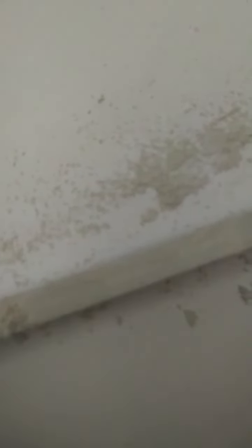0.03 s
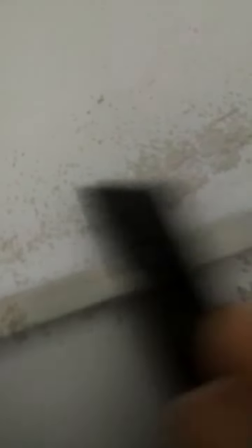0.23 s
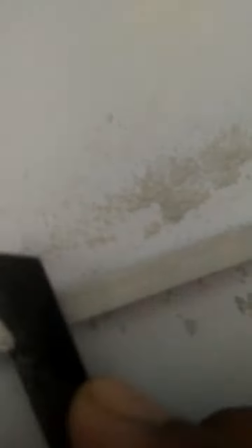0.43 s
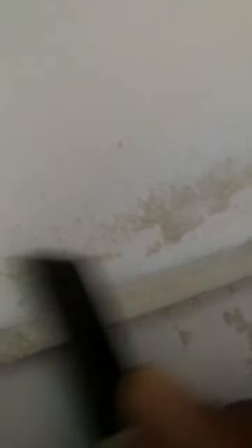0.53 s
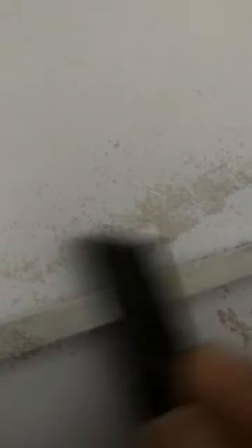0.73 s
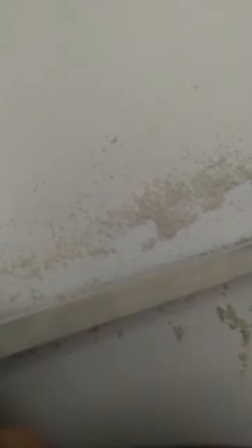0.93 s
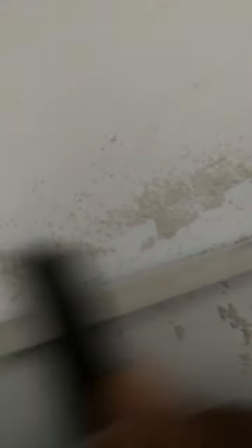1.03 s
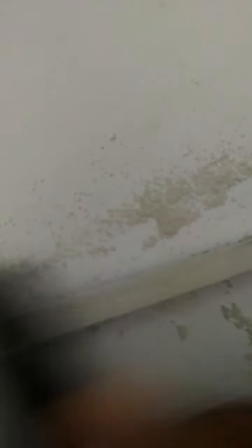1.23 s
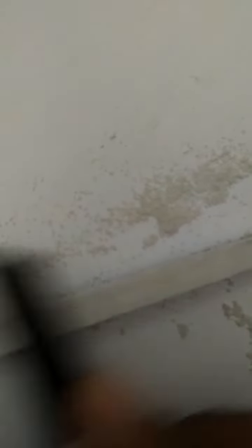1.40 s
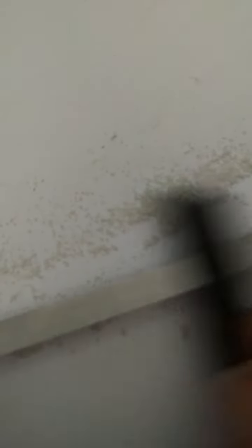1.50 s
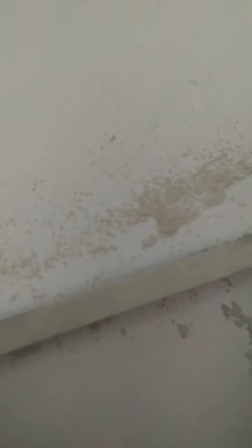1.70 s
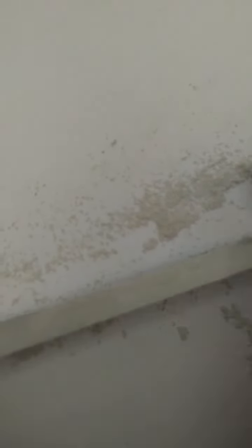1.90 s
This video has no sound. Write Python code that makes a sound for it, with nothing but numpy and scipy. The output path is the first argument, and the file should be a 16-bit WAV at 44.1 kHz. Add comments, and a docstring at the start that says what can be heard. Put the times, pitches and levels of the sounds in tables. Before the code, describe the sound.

Gritty scraping, heard close up in a small quiet room: a flat blade catches on paint chips and rings slightly as it works back and forth three times across a wall, bumping a ledge and finishing with two light taps.

```python
"""A flat hand-held blade scrapes flaking paint off a wall, close to the microphone in a small room.
The edge bites in stick-slip jerks and catches on chips; faint tones rise through the first push.
Three firm pushes go by, each followed by a light drag back: grit under the edge rings the blade, rasps
and hisses while the wall rumbles. From the second drag on, hand and blade bump the ledge.
Last come a couple of taps on the wall as the edge slides off."""
import sys
import numpy as np
from scipy import signal
from scipy.fft import rfft, irfft
from scipy.io import wavfile
from scipy.ndimage import uniform_filter1d

SR = 44100
rng = np.random.default_rng(int(sys.argv[2]) if len(sys.argv) > 2 else 0)


def unload_audio(sound):
    """Save the sound as a 16-bit wav file, at the path given as the first command line argument."""
    columns = np.transpose(np.atleast_2d(sound))
    # keep every value between -1 and 1, then stretch to whole-number steps
    steps = np.round(np.clip(columns, -1, 1) * 32767)
    wavfile.write(sys.argv[1], SR, steps.astype(np.int16))


N = 85995
T = np.arange(N) / SR

# room tone at the microphone: f/Hz, gain/dB
ROOM_TONE_COLOUR = [(25,-2.5),(60,-3.5),(100,5),(190,-8.5),(380,-6.5),(630,-19.5),(1500,-20.5),(2800,-24),(4000,-34.5),(15500,-41)]
# near reflections off wall, ledge and hand: delay/s, gain/dB
REFLECTIONS = [(.0079,-24),(0.0139,-22.5)]
# lightly damped modes of wall and blade: f/Hz, gain/dB
LINGER_MODES = [(90,-10),(512,-5),(625,-1),(1981,-9),(2412,-9.5)]
# gliding tones: t/s, f/Hz, level/dB
THIN_RING_PATH = [(0,2930,-86.5),(.55,2907,-72),(.75,2783,-82),(1.02,2778,-69),(1.23,2830,-79),(1.41,2891,-67),(1.76,2850,-97)]
RISING_TONE_PATH = [(0.124,805,-68),(.17,812,-46),(.225,818,-53),(0.259,835,-76),(0.313,855,-48.5),(0.379,868,-53.5),(0.461,935,-49),(.55,1050,-59),(.605,1170,-77)]
ZING_PATHS = [
    [(.178,5800,-46),(.226,5230,-73),(.3,5800,-58),(.37,5630,-58)],
    [(.85,7000,-66),(.885,7170,-54),(.91,8400,-58.5),(.932,7900,-48),(.98,8360,-61),(.995,8150,-83)],
    [(1.305,6900,-65),(1.335,7460,-57.5),(1.36,8250,-55),(1.39,8000,-57.5),(1.402,8100,-94)],
]  # one table per push
# stick-slip jerks as the first push starts and stops: t/s, level/dB, length/s
JERKS = [(0.113,-57,0.0035),(0.1202,-44.5,0.0031),(0.133,-41.5,0.0028),(0.1374,-40.5,0.0019),(0.144,-51,0.0022),(0.161,-33.5,0.0084),(0.1734,-40,0.0019),(0.511,-55,0.0011)]
# dull bumps on the ledge: t/s, level/dB, f/Hz, t60/s
LEDGE_BUMPS = [(1.096,-30,139,0.074),(1.156,-41,119.5,0.15),(1.433,-29.5,346,0.049),(1.511,-28.5,228,0.034),(1.698,-36.5,297,.04)]
# taps on the wall: t/s, level/dB, tick gain/dB
WALL_TAPS = [(1.6153,-24,-5),(1.689,-20,-15),(1.6923,-30.5,6.5),(1.6946,-25,-13)]
# a tap's knock and its bright tick: f/Hz, gain/dB, t60/s
TAP_KNOCK_MODES = [(268,-19.5,0.042),(474,-12.5,0.022),(1594,-18.5,0.045),(1920,-7,0.0081),(2155,-4.5,0.0087),(3010,-12.5,0.014)]
TAP_TICK_MODES = [(4520,-10.5,0.0039),(5100,-6,0.0017),(7200,-14,0.005),(9100,-11,0.0041),(10900,-19,0.0042)]
# catches on paint chips: t/s, level/dB, blade pitch/Hz
CHIP_CATCHES = [(0.1467,-28.5,2624),(0.1816,-22,2560),(0.2125,-23.5,2550),(0.2154,-20,2550),(0.22,-20,2510),(0.223,-25.5,2540),(.2302,-26.5,2330),(0.2393,-25.5,2450),(0.2457,-23.5,2500),(0.2577,-21.5,2460),(.2618,-26.5,2600),(0.291,-33.5,2620),(0.429,-30,2550),(.882,-26.5,2360),(0.9407,-30.5,2080),(1.6059,-31.5,2440),(1.6106,-28.5,2560),(1.6156,-19.5,2378),(1.6761,-33,2425)]
# the blade as it snaps free: ratio to blade pitch, gain/dB, t60/s
SNAP_MODES = [(.23,-15,0.016),(.93,-5,0.026),(1,7,0.0094),(1.33,-6,0.0022),(2.1,-9,0.0068)]
# colours of the contact, heard close up: f/Hz, gain/dB
BITE_COLOUR = [(100,4),(500,0),(1000,-45.5),(1900,-21),(2300,10),(2750,13.5),(3300,-5),(4000,-10),(4700,-5),(5900,-11.5),(6800,-16.5),(8200,-23),(10000,-29),(15000,-37)]
BLADE_COLOUR = [(500,-60),(1300,-17.5),(1800,1),(2200,-1),(2700,0),(3050,-4.5),(3450,-2),(4000,-11.5),(4500,-5.5),(5200,-10.5),(6000,-6),(6800,-11.5),(9000,-31.5),(15000,-20)]
RASP_COLOUR = [(100,-18),(250,-2.5),(520,3),(750,-1.5),(1100,1.5),(1450,4),(1900,0.5),(2700,-3.5),(3400,-1),(4000,-16),(5300,-23.5),(7000,-26),(10000,-39.5),(15000,-48.5)]
HISS_COLOUR = [(2500,-25.5),(4200,-2.5),(5500,4),(6800,-5.5),(8100,0),(8900,-4.5),(10000,-9.5),(12000,-14),(14000,-46.5),(15500,-15)]
RUMBLE_COLOUR = [(20,-42.5),(40,-32.5),(60,-7),(86,1),(104,-0.5),(140,0.5),(185,-11),(240,-9.5),(330,-9),(540,-13),(720,-27),(1500,-47)]
# one table per stroke, before trims: t/s, blade ring/dB, blade pitch/Hz, rasp/dB, hiss/dB, rumble/dB
PRESS_STROKE = [(.112,-80,2580,-68,-108,-53),(.128,-69.5,2620,-56.5,-102,-50),(.1779,-57,2550,-53.5,-94.5,-63.5)]  # pressing on between the first jerks
PUSH_STROKES = [
    [(.178,-38.5,2630,-46,-56.5,-49.5),(.204,-30,2670,-47.5,-64,-48.5),(.229,-28,2450,-44.5,-48.5,-50.5),(.312,-35,2590,-43,-64.5,-54),(.355,-45.5,2480,-44.5,-59,-53),(.44,-36.5,2660,-46.5,-59,-47),(.503,-42,2404,-47,-72,-47.5),(.516,-53,2380,-51.5,-89,-57),(.529,-59.5,2340,-65,-101,-46.5),(.615,-78,2230,-72,-102,-76)],
    [(.789,-53.5,1990,-55.5,-69,-55.5),(.85,-43.5,2350,-46,-58,-50),(.88,-33.5,2270,-48.5,-55.5,-45),(.93,-37,2060,-46,-53,-48),(.97,-39.5,1883,-47,-86,-46),(.983,-46,2040,-48,-72,-48.5),(.996,-91,2030,-62.5,-90,-51.5),(1.045,-84,2300,-75,-75,-59.5)],
    [(1.237,-95,2090,-74,-99,-74),(1.258,-43.5,2110,-48.5,-61.5,-56),(1.3,-43,2400,-49,-59,-51),(1.322,-35,2500,-44.5,-55,-44.5),(1.355,-33.5,2080,-46.5,-51.5,-45.5),(1.383,-43.5,2080,-44,-61,-48),(1.404,-60,2100,-64,-84,-53),(1.425,-73,2120,-64,-68,-56)],
]
DRAG_STROKES = [
    [(.617,-76,2200,-67,-82,-75),(.626,-67,2310,-63,-80,-50),(.658,-51,2570,-60.5,-67.5,-51),(.694,-62.5,2410,-62,-71.5,-56),(.735,-80.5,2230,-87.5,-102,-69)],
    [(1.05,-74,2210,-68,-82,-51),(1.06,-53.5,2070,-60,-72,-51.5),(1.078,-53,2017,-59,-67,-51),(1.088,-42,1990,-59,-65,-45.5),(1.13,-44.5,2250,-53.5,-62.5,-43.5),(1.175,-60,2400,-62,-69,-46.5),(1.202,-53,2340,-59.5,-73,-44),(1.233,-102,2304,-78,-105,-64)],
    [(1.427,-76,2265,-77,-76,-55),(1.438,-56.5,2200,-54.5,-66,-50),(1.492,-51,2020,-56.5,-64.5,-47),(1.535,-50.5,2520,-55.5,-65.5,-45),(1.578,-52,2510,-63,-69,-54),(1.594,-52,2516,-54,-73,-58)],
]
SLIDE_STROKE = [(1.595,-41.5,2700,-64,-77,-39),(1.63,-52,2495,-52,-66.5,-51),(1.68,-47,2470,-65.5,-77,-50),(1.705,-66,2146,-54,-69,-45.5),(1.755,-90,2090,-81.5,-91,-58),(1.78,-83,2093,-92,-100,-76)]  # resting and sliding off around the taps

GRAINS_PER_S, GRAIN_SPREAD_DB, POWDER_GAIN = 4000, 3.5, 0.54
JUDDER_HZ, JUDDER_DB = 127, 1.41


def amp(db):
    """Decibels to gain."""
    return 10 ** (np.asarray(db) / 20)


def unit(x):
    """Scales to rms 1."""
    return x / np.sqrt(np.mean(x ** 2) + 1e-20)


def add(mix, s, sound):
    """Mixes a sound in at time s."""
    part = mix[round(s * SR):][:len(sound)]
    part += sound[:len(part)]


def colour(x, points):
    """Minimum-phase filter through rows of f/Hz, gain/dB; the result has rms 1."""
    f, db = np.transpose(points)
    hz = abs(np.fft.fftfreq(4096, 1 / SR))
    log_gain = np.log(amp(np.interp(np.log(hz + 1), np.log(f), db)))
    response = np.fft.ifft(np.exp(np.conj(signal.hilbert(log_gain)))).real
    return unit(signal.fftconvolve(x, response)[:len(x)])


def resonate(x, hz, width_hz):
    """A resonance that follows the curve hz; the result has rms 1."""
    turn = np.exp(2j * np.pi * np.cumsum(hz) / SR)
    pole = np.exp(-np.pi * width_hz / SR)
    return unit((turn * signal.lfilter([1 - pole], [1, -pole], x / turn)).real)


def wobble(rate_hz):
    """Smooth random motion of rms 1, up to the given rate."""
    slow = np.fft.rfftfreq(N, 1 / SR) < rate_hz
    return unit(irfft(rfft(rng.standard_normal(N)) * slow, N))


def ring(modes, rise_s):
    """Modes (f/Hz, level/dB, t60/s) dying away after a blow that takes rise_s."""
    t = T[:SR // 5]
    onset = 1 - np.exp(-(t / rise_s) ** 2)
    return onset * sum(amp(db) * 1000 ** (-t / t60) * np.sin(2 * np.pi * hz * t) for hz, db, t60 in modes)


def grit():
    """Grains breaking under the edge, over fine powder."""
    size = amp(GRAIN_SPREAD_DB * np.minimum(rng.exponential(1, N), 4)) * rng.choice([-1, 1], N)
    breaks = rng.random(N) < GRAINS_PER_S / SR
    return unit(unit(size * breaks) + POWDER_GAIN * rng.standard_normal(N))


def glide(path, width_hz):
    """Grit sent twice through a resonance that follows rows of t/s, f/Hz, level/dB."""
    s, hz, db = np.transpose(path)
    pitch = np.interp(T, s, hz)
    level = amp(np.interp(T, s, db, left=-np.inf, right=-np.inf))
    return level * resonate(resonate(grit(), pitch, width_hz), pitch, width_hz)


def room_tone(level_db=-71.5):
    """The quiet room: steady, mostly low noise behind everything."""
    return amp(level_db) * colour(rng.standard_normal(N), ROOM_TONE_COLOUR)


def room(x, tail_db=-23, t60_s=0.026):
    """What the small room returns to the microphone: two near reflections and a short, faint tail."""
    t = T[:SR // 3]
    tail = rng.standard_normal(len(t)) * amp(-60 * t / t60_s) * (t > .003)
    response = amp(tail_db) * tail / np.linalg.norm(tail)
    for s, db in REFLECTIONS:
        add(response, s, amp(db) * np.hanning(5) / 2)
    return signal.fftconvolve(x, response)[:N]


def thin_ring():
    """A thin ring hangs on between the strokes, its pitch shifting with the grip."""
    return glide(THIN_RING_PATH, width_hz=85)


def linger(x, t60_s=.22):
    """The scraping feeds modes of wall and blade that ring on after each stroke."""
    t = T[:SR // 2]
    fade = amp(-60 * t / t60_s)
    modes = sum(amp(db) * np.cos(2 * np.pi * hz * t) for hz, db in LINGER_MODES)
    return signal.fftconvolve(x, 2 * modes * fade / fade.sum())[:N]


def rising_tones(jitter=.018, rough_db=4.5, rough_hz=70, upper_ratio=1.47, upper_db=-15):
    """A faint, rough pair of tones rises through the first push."""
    s, hz, db = np.transpose(RISING_TONE_PATH)
    pitch = np.interp(T, s, hz) * (1 + jitter * wobble(JUDDER_HZ))
    phase = 2 * np.pi * np.cumsum(pitch) / SR
    level = amp(np.interp(T, s, db, left=-np.inf, right=-np.inf))
    roughness = unit(amp(rough_db * wobble(rough_hz)))
    upper = amp(upper_db) * wobble(rough_hz) * np.sin(upper_ratio * phase)
    return level * roughness * unit(np.sin(phase) + upper)


def zings():
    """The edge zings high up under the pressure of each push."""
    return sum(glide(path, width_hz=1150) for path in ZING_PATHS)


def bites(rise_s=0.00089, release_s=0.00036):
    """The edge sticks and slips, each jerk a few milliseconds of crunch."""
    slip = np.zeros(N)
    for s, db, length in JERKS:
        onset = np.clip((T - s) / rise_s, 0, 1)
        release = np.exp(-np.maximum(T - s - length, 0) / release_s)
        slip += amp(db) * onset * release
    return slip * colour(rng.standard_normal(N), BITE_COLOUR)


def bumps():
    """Hand and blade bump the ledge, each time sounding one low mode."""
    out = np.zeros(N)
    for s, db, hz, t60 in LEDGE_BUMPS:
        add(out, s, ring([(hz, db, t60)], rise_s=0.0023))
    return out


def taps():
    """The blade taps the wall: a knock with a bright tick on top."""
    out = np.zeros(N)
    knock = ring(TAP_KNOCK_MODES, rise_s=0.00029)
    tick = ring(TAP_TICK_MODES, rise_s=0.00015)
    for s, db, tick_db in WALL_TAPS:
        add(out, s, amp(db) * (knock + amp(tick_db) * tick))
    return out


def catches():
    """The edge catches on paint chips and snaps free, ringing the blade."""
    out = np.zeros(N)
    for s, db, hz in CHIP_CATCHES:
        modes = [(hz * ratio, mode_db, t60) for ratio, mode_db, t60 in SNAP_MODES]
        add(out, s, amp(db) * ring(modes, rise_s=0.00055))
    return out


def gap_echo(x, delay_s=.00055, swing=.16, rate_hz=7, gain=.55):
    """The gap between blade and wall changes as the hand moves, so its reflection shifts the colour."""
    delay = delay_s * (1 + swing * wobble(rate_hz))
    return unit(x + gain * np.interp(T - delay, T, x))


def scrape(strokes, blade_trim_db, rasp_trim_db, hiss_trim_db, rumble_trim_db):
    """Grit, bunched by judder, rings the blade, rasps and hisses; the wall rumbles under each stroke."""
    rows = np.concatenate(strokes)
    times = np.sort(rows[:, 0])
    blade_db, pitch, rasp_db, hiss_db, rumble_db = (np.interp(T, times, col) for col in rows.T[1:])
    in_stroke = sum(1. * (T >= stroke[0][0]) * (T < stroke[-1][0]) for stroke in strokes)
    contact = uniform_filter1d(in_stroke, size=400)  # 9 ms to land or lift
    judder = unit(amp(JUDDER_DB * wobble(JUDDER_HZ)))
    blade = colour(resonate(grit() * judder, pitch, width_hz=414), BLADE_COLOUR)
    rasp = colour(grit() * judder, RASP_COLOUR)
    hiss = colour(gap_echo((grit() + rng.standard_normal(N)) * judder), HISS_COLOUR)
    rumble = colour(grit(), RUMBLE_COLOUR)
    return contact * (amp(blade_db + blade_trim_db) * blade
                      + amp(rasp_db + rasp_trim_db) * rasp
                      + amp(hiss_db + hiss_trim_db) * hiss
                      + amp(rumble_db + rumble_trim_db) * rumble)


def scene():
    """One microphone close to the blade, the room faint behind it."""
    pushes = scrape([PRESS_STROKE] + PUSH_STROKES,
                    blade_trim_db=-1.0, rasp_trim_db=1.0, hiss_trim_db=-3.5, rumble_trim_db=-1.5)
    drags = scrape(DRAG_STROKES + [SLIDE_STROKE],
                   blade_trim_db=-2.5, rasp_trim_db=1.5, hiss_trim_db=0.0, rumble_trim_db=-3.0)
    scraping = pushes + drags
    direct = (scraping + linger(scraping) + bites() + rising_tones() + zings()
              + catches() + taps() + bumps())
    return (direct + room(direct) + thin_ring() + room_tone())[None]


def record(dry):
    """The recorder passes sound up to 15.7 kHz."""
    lowpass = signal.firwin(511, 15700, window=("kaiser", 9), fs=SR)
    return signal.oaconvolve(dry, lowpass[None], "same")


dry = scene()
out = record(dry)
unload_audio(out)
```